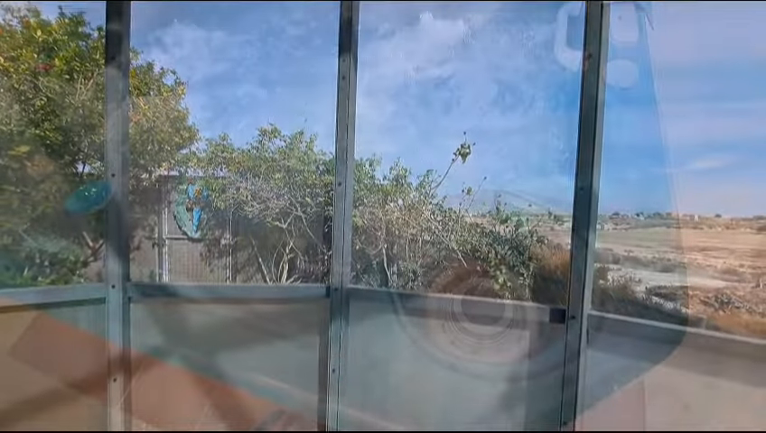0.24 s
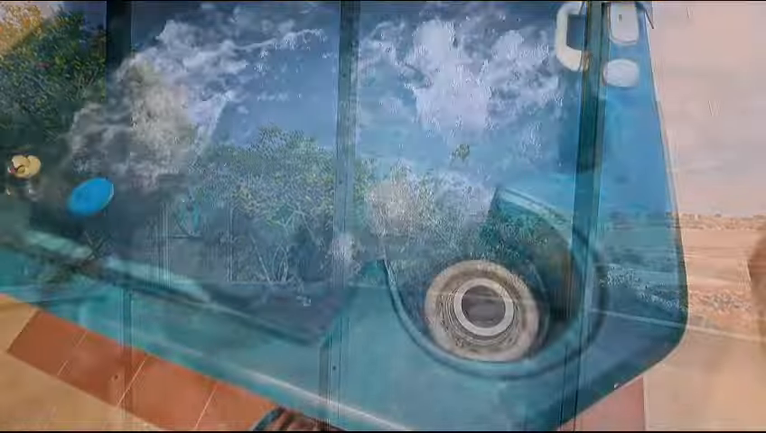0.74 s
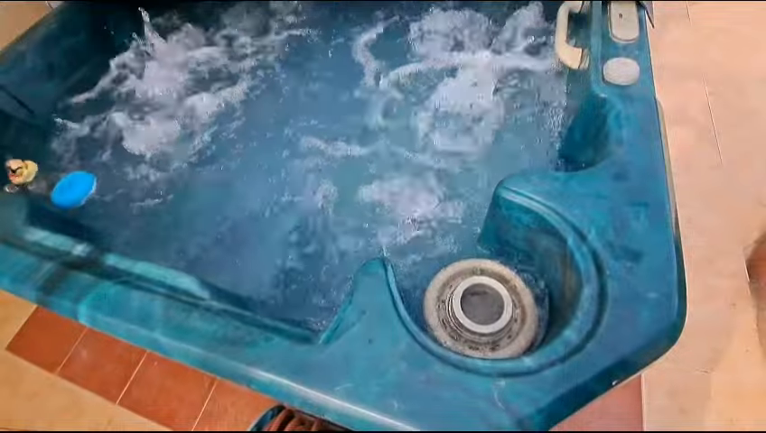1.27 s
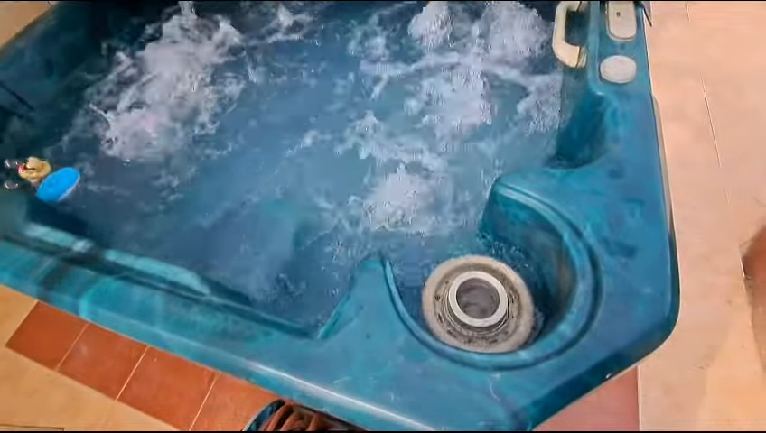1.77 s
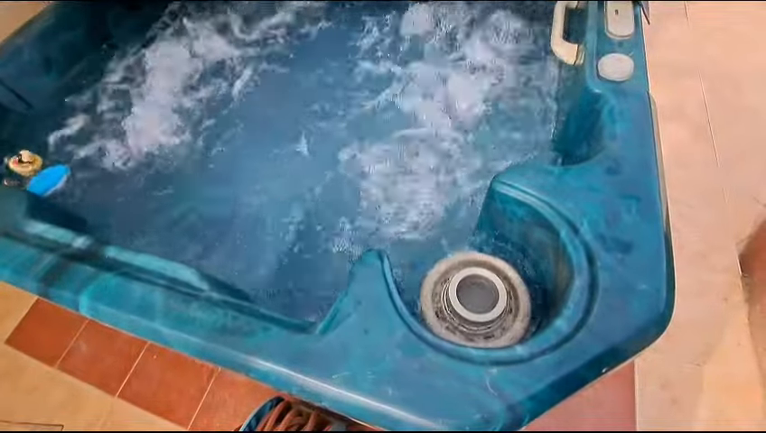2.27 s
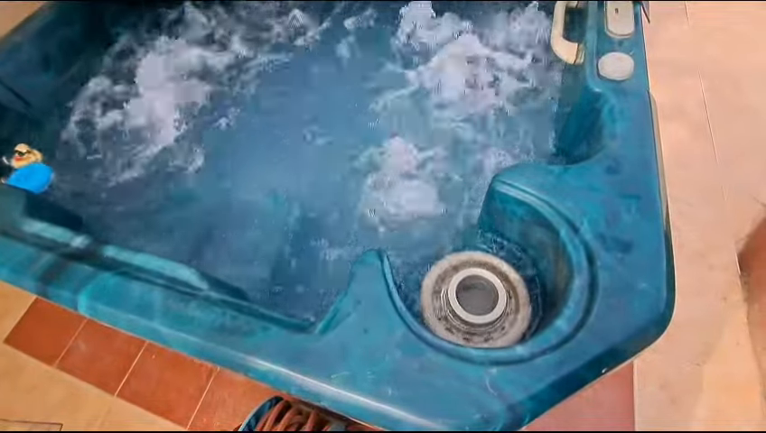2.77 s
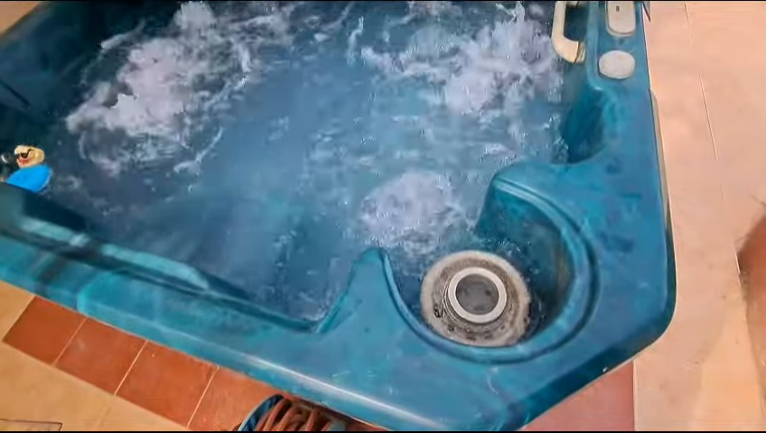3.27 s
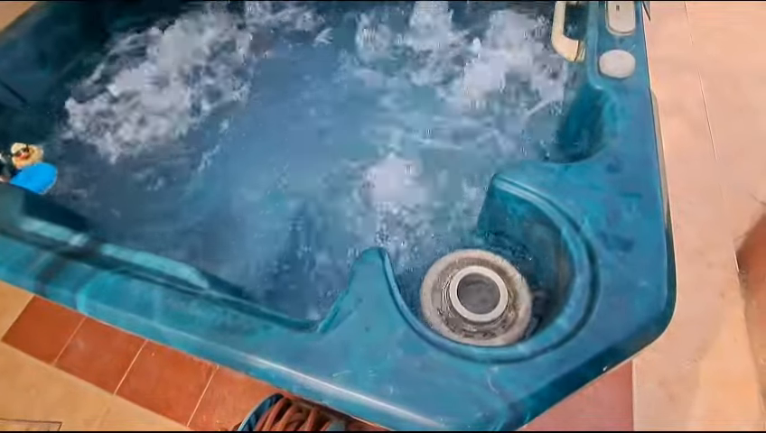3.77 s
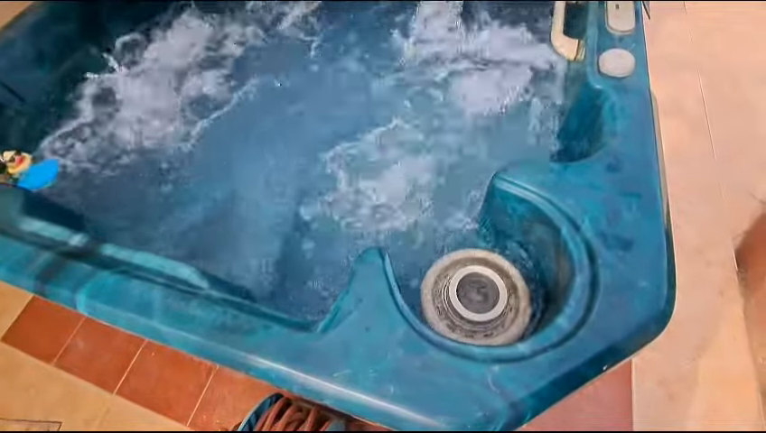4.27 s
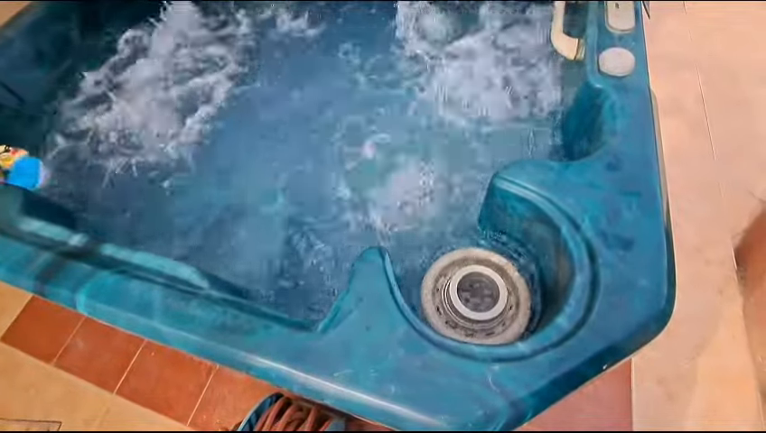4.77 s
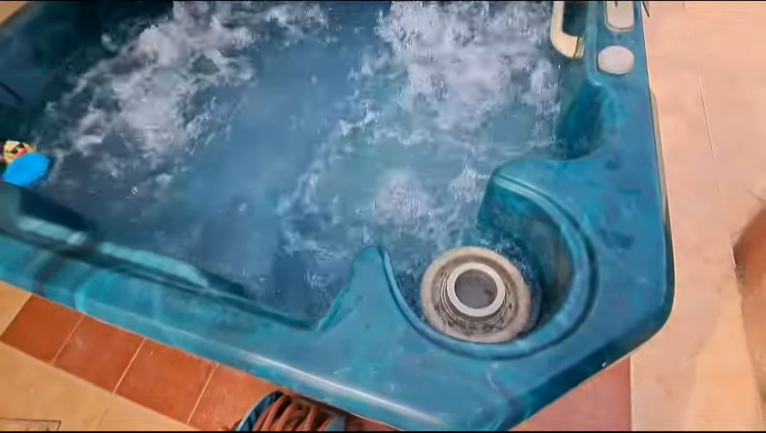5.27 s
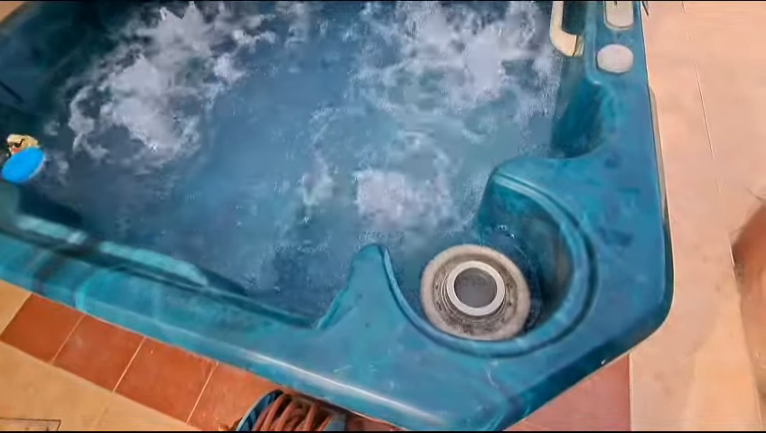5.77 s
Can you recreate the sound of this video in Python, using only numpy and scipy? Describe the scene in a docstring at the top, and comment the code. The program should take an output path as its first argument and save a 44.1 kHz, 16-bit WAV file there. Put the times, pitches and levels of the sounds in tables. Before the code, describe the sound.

After half a second of near-silent terrace air, a hot tub abruptly starts churning close by, gulping, splashing and fizzing, with wind buffeting late.

```python
"""A hot tub with its jets running, heard close on two microphone ports, after half a second of quiet terrace.
Pockets of air gulp and churn under water as swarms of ringing bubbles that climb in pitch.
The boiling surface splashes and plops, foam fizzes in fine clicks and spray ticks; glazed walls answer briefly.
The terrace behind is a fading bed of coloured noise. A light breeze lies over both places, with faint gusts
on the terrace and strong ones near the end that buffet mostly the left port as low, uneven noise."""
import sys
import numpy as np
from scipy import signal
from scipy.fft import rfft, irfft, next_fast_len
from scipy.io import wavfile
from scipy.ndimage import map_coordinates

SR = 44100
rng = np.random.default_rng(int(sys.argv[2]) if len(sys.argv) > 2 else 0)


def unload_wav(signal):
    """Save mono or channel-first audio to the path in sys.argv[1] as 16-bit WAV at rate SR, clipped to [-1, 1]."""
    wavfile.write(
        sys.argv[1],
        SR,
        np.round(np.clip(np.atleast_2d(signal).T, -1, 1) * 32767).astype(np.int16),
    )


N = 265482  # samples, about 6 s

# The biggest air pockets. Each row: time in seconds, level in dB before the run's own levels,
# pitch in Hz before the run's ratios, swell of the churning around it in dB.
GULPS = [(0.626, -11.5, 236, -0.5), (0.654, -8.5, 272, 2), (1.04, -10.5, 196, 1.5), (1.069, -9, 282, 0),
         (1.25, -8.5, 260, 4), (1.56, -12.5, 228, 3.5), (1.836, -2, 266.5, 1), (2.142, -10, 243, 0.5),
         (2.249, -12.5, 231.5, 3.5), (2.427, -9.5, 247, 2), (2.69, -13, 343, 1.5), (2.89, -14, 260, 2.5),
         (3.166, -13, 171, 1), (3.294, -11, 244, 1), (3.514, -8, 230, 2.5), (3.8, -11, 281, -5),
         (3.941, -10.5, 227, -0.5), (4.268, -5.5, 292, -4.5), (4.37, -13, 293, 0), (4.814, -13, 172, -2),
         (4.889, -10.5, 220, 2), (4.985, -12, 279, 0.5), (5.183, -13, 226, 1.5), (5.39, -16, 335, 1),
         (5.436, -7, 220, 4), (5.605, -4.5, 266, 3)]
# A pocket comes up as a rising run of three bubbles. Each row: delay in seconds,
# pitch as a ratio to the pocket's, level in dB relative to the pocket's.
GULP_RUN = [(-.014, 0.721, -12.5), (0, .9, -6.5), (.015, 1.35, -18)]
# Colour of the churning under water. Each row: frequency in Hz, relative gain in dB.
CHURN_COLOUR = [(15, -51), (25, -29), (43, -9.5), (70, -7), (140, -3), (205, -5), (269, -3.5), (305, -3),
                (446, -10.5), (491, -13.5), (729, -20.5), (924, -23.5), (1100, -23), (1430, -30),
                (2420, -120)]
# How hard the surface boils. Each row: time in seconds, splash level in dB before trim and swells.
BOIL = [(.6, -37), (1.3, -38), (1.8, -34), (2.5, -33.5), (3.0, -34), (3.7, -33), (4.2, -33.5), (5.25, -34),
        (5.55, -34.5), (6.0, -35.5)]
# Crests that break and throw spray. Each row: time in seconds, length in seconds,
# swell of the splash in dB, swell of the fizz in dB.
CRESTS = [(0.796, .2, 0.5, 2.5), (1.262, .1, 2.5, 3), (1.79, 0.18, 1.5, 4), (2.117, 0.078, 1.5, 3),
          (2.327, .1, 1.5, 2.5), (2.41, .05, 3.5, 4.5), (2.48, 0.076, 2, 7), (2.612, 0.13, 2.5, 4),
          (2.792, 0.029, 1.5, 4), (2.935, 0.085, 2, 5), (3.252, .06, 3.5, 5), (3.43, .14, 1, 1),
          (3.61, 0.036, 2.5, 4.5), (3.833, 0.14, 4.5, 5), (4.35, 0.047, 0, 4.5), (4.795, .08, 1.5, 6.5),
          (4.878, 0.097, 3, 1), (5.29, 0.17, 3.5, 4.5), (5.864, 0.032, 4, 5)]
# Colour of the splashing surface. Each row: frequency in Hz, relative gain in dB.
SPLASH_COLOUR = [(350, -7.5), (600, -1), (733, -0.5), (1020, -9), (1270, -5.5), (1670, -7.5), (2320, -8),
                 (3020, -13.5), (5520, -21.5), (7500, -26.5), (9750, -40), (16500, -120)]
# Colour of the foam. Each row: frequency in Hz, relative gain in dB.
FIZZ_COLOUR = [(2650, -0.5), (4500, 0), (5550, -3), (7960, -14.5), (12900, -2), (15200, -10), (15700, -6)]
# Bubbles bursting at the surface. Each row: start in seconds, level in dB before the mix of ring and splat,
# nominal pitch in Hz.
PLOPS = [(0.743, -18.5, 1160), (1.402, -15.5, 1144), (1.783, -19, 2300), (1.813, -14, 2300),
         (1.935, -19, 620), (2.474, -12, 766), (2.515, -14.5, 2040), (2.601, -19, 759), (2.713, -14, 578),
         (3.398, -13, 730), (3.436, -16.5, 1360), (3.55, -14, 1110), (3.732, -13.5, 2180),
         (3.862, -13.5, 636), (4.354, -14.5, 1230), (4.651, -17.5, 2030), (4.883, -10, 2310),
         (5.361, -14, 1680)]
# The nearest drops of spray. Each row: start in seconds, level in dB before colouring,
# left over right in dB before the ports' colour.
DROPS = [(1.138, -31, -6.0), (1.2175, -28, 7), (1.7434, -35, -4.5), (2.094, -28, -5), (2.109, -27, -4.0),
         (2.2717, -28, 0), (2.3, -25.5, -3), (2.492, -22.5, 1), (2.498, -23, 7), (3.0004, -30, -2),
         (3.7898, -26, 3), (4.043, -27, -6), (4.5236, -27, 6), (4.803, -26, -1), (4.8793, -27, -1),
         (4.9862, -25, 5), (5.2824, -25, -4.0), (5.3254, -27, -7.0), (5.3357, -26, -10), (5.8351, -24, -8)]
# Colour of a drop's tick. Each row: frequency in Hz, gain in dB.
TICK_COLOUR = [(800, -25), (3000, 5), (5500, 6.5), (8500, -9), (13000, -6), (16000, -10)]
# How long the glazed walls ring on. Each row: frequency in Hz, time to fall 60 dB in seconds.
WALL_DECAY = [(150, 0.069), (1500, 0.15), (12000, 0.092)]
# How alike the two sides of a wide sound are. Each row: frequency in Hz, left-right correlation (0 to 1).
LIKENESS = [(40, 0.72), (120, 0.99), (280, 0.98), (500, 0.67), (1000, 0.41), (2500, 0.076), (6000, 0.05),
            (15000, 0.038)]
# Difference in colour of the two microphone ports. Each row: frequency in Hz, left over right in dB.
PORTS = [(60, 0), (210, 0), (500, -2.3), (800, -1.5), (1200, -3.5), (2000, -8), (4200, -8.5), (6000, -6.5),
         (7800, 6.5), (9800, 11.5), (12500, -2), (15000, 0)]
# Gusts on the ports. Each row: time of the peak in seconds, length in seconds,
# level on the left port in dB before the flutter.
GUSTS = [(0.194, 0.095, -55), (0.324, 0.089, -53), (0.427, 0.045, -59), (4.63, .06, -29),
         (5.27, 0.2, -23.5), (5.44, 0.078, -19), (5.603, 0.17, -22.5), (5.723, 0.16, -17)]
# Colour of wind on a port. Each row: frequency in Hz, relative gain in dB.
BUFFET_COLOUR = [(15, -32), (40, -5), (70, -0.5), (130, -7.5), (250, -14), (500, -20), (1500, -58),
                 (5000, -100)]
# Colour of the terrace air. Each row: frequency in Hz, relative gain in dB.
TERRACE_COLOUR = [(59, -22), (100, -22), (217, -13), (304, -9), (345, -2), (524, -12), (607, -5.5),
                  (942, -14), (1730, -14.5), (1960, -19), (3530, -24), (6350, -21.5), (8170, -33),
                  (15000, -35)]

TERRACE_ENDS_S, TUB_STARTS_S, TUB_FADE_IN_S = 0.541, 0.589, 0.0027
USUAL_BOIL_DB = -34
# levels at the usual boil, before swells, and dB more for each dB of boil
CHURN_DB, CHURN_GROWS = -25, 0.69
FIZZ_DB, FIZZ_GROWS = -44, 0.91
GURGLE_S = 0.13  # width of the churning's swell around a pocket
# the opposite swing after the swell: delay, width, depth as a share of the swell
LULL_AFTER_S, LULL_S, LULL_SHARE = 0.092, 0.15, 0.29
BREEZE_DB = -69  # the light air under the gusts, on the left port before the flutter
TERRACE_DB, TERRACE_FADE_DB_PER_S = -60.5, 10.5  # level at the start, and its fall
TOP_HZ = 15900  # upper limit of the recorder


def amp(db):
    """Decibels to gain."""
    return 10 ** (np.asarray(db) / 20)


def unit(x):
    """Scale to rms 1."""
    return x / np.sqrt(np.mean(x ** 2) + 1e-20)


def along(points, hz):
    """Read (Hz, value) points on a log frequency axis."""
    f, v = np.transpose(points)
    return np.interp(np.log(hz + 1), np.log(f + 1), v)


def wobble(rate):
    """A smooth random curve, rate knots a second."""
    knots = rng.standard_normal(2000)
    return map_coordinates(knots, [np.arange(N) * rate / SR], mode="wrap")


def hump(s, length):
    """A smooth rise to 1 at s seconds and back, length seconds wide at 1/e."""
    return np.exp(-np.minimum((2 * (np.arange(N) / SR - s) / length) ** 2, 50))


def noise():
    """Two unrelated white noises."""
    return rng.standard_normal((2, N))


def filtered(x, response):
    """Multiply the spectrum of x by a response of frequency."""
    m = next_fast_len(N + SR // 4)
    return irfft(rfft(x, m) * response(np.fft.rfftfreq(m, 1 / SR)), m)[..., :N]


def spread(pair, colour):
    """Colour two unrelated signals and share them between the sides: bass alike, treble apart."""
    def response(hz):
        turn = np.arccos(np.clip(along(LIKENESS, hz), -1, 1)) / 2
        return amp(along(colour, hz)) * np.array([np.cos(turn), np.sin(turn)])

    mid, side = filtered(np.array([pair[0] + pair[1], pair[0] - pair[1]]), response)
    return unit(np.array([mid + side, mid - side]))


def bubble(age, life, rise, swell):
    """A bubble's ring, all ages in cycles: it swells, dies by 40 dB over its life and climbs in pitch."""
    envelope = (1 - np.exp(-(age / swell) ** 2)) * 100 ** (-age / life)
    return envelope * np.sin(2 * np.pi * age * (1 + rise * age / (2 * life)))


def swarm(count, low_hz, high_hz, life, rise, swell, scatter_db):
    """Two streams of bubbles of random time, size and pitch, about even in power per Hz."""
    when, pitch, size, ear, damping = rng.random((count, 5)).T
    hz = low_hz * (high_hz / low_hz) ** pitch
    # louder with pitch, so that the shorter rings of high bubbles keep the power even
    gain = hz * amp(-scatter_db * np.log(np.maximum(size, np.exp(-5))))
    lives = life * 2 ** (damping - 0.5)
    k = np.arange(min(int(life * SR / low_hz), 3000000 // count))  # the cap saves memory
    rings = gain[:, None] * bubble(hz[:, None] * k / SR, lives[:, None], rise, swell)
    # both streams lie end to end in one line; each bubble falls into one of them
    first = (when * N).astype(int) + N * (ear > 0.5)
    at = first[:, None] + k
    line = np.bincount(at.ravel(), rings.ravel(), 2 * N)[:2 * N]
    return unit(line.reshape(2, N))


def churn(level_db):
    """Air from the jets breaks into large bubbles over the rumble of the moving water."""
    large = swarm(count=1300, low_hz=111.5, high_hz=443.3, life=13.4, rise=0.25, swell=1.31, scatter_db=0.04)
    small = swarm(count=1500, low_hz=413, high_hz=1237, life=11.8, rise=0.16, swell=0.78, scatter_db=2.5)
    water = large + small + amp(14.5) * noise()
    return amp(level_db + 0.66 * wobble(22)) * spread(water, CHURN_COLOUR)


def gurgles():
    """Decibels by which the churning swings around each air pocket and then the opposite way behind it."""
    return sum(swell_db * (hump(s, GURGLE_S) - LULL_SHARE * hump(s + LULL_AFTER_S, LULL_S))
               for s, _, _, swell_db in GULPS)


def gulps():
    """Now and then a big pocket of air wells up with a hollow, rising note, alike on both sides."""
    out, t = np.zeros(N + SR), np.arange(SR // 8) / SR
    for s, db, hz, _ in GULPS:
        for delay, ratio, share_db in GULP_RUN:
            ring = bubble(ratio * hz * t, life=13.1, rise=0.48, swell=0.97)
            ring = ring / np.abs(ring).max()
            out[round((s + delay) * SR):][:len(t)] += amp(db + share_db) * ring
    return out[:N]


def crests():
    """Decibels by which breaking crests lift the splash and the fizz."""
    return sum(np.outer([splash_db, fizz_db], hump(s, length)) for s, length, splash_db, fizz_db in CRESTS)


def splash(level_db, surge):
    """The boiling surface folds over on itself: a wash full of small ringing bubbles."""
    plinks = swarm(count=3600, low_hz=748, high_hz=3046, life=21.4, rise=0.16, swell=0.17, scatter_db=2.5)
    patter = swarm(count=9000, low_hz=2994, high_hz=7070, life=27, rise=0.11, swell=0.24, scatter_db=2.5)
    water = plinks + amp(3.5) * patter + amp(12) * noise()
    swing_db = 1.44 * surge + 0.25 * wobble(25)
    return amp(level_db + 2 + swing_db) * spread(water, SPLASH_COLOUR)  # 2 dB trim


def fizz(level_db, surge):
    """Foam bursts in tiny sharp clicks over a fine hiss."""
    clicks = swarm(count=7000, low_hz=4500, high_hz=15100, life=4, rise=0.1, swell=0.093, scatter_db=3)
    foam = clicks + amp(4) * noise()
    swing_db = 0.26 * surge + 1.45 * wobble(70)
    return amp(level_db + swing_db) * spread(foam, FIZZ_COLOUR)


def plops():
    """A bubble's skin tears open: its cavity rings briefly inside a splat of water."""
    out, t = np.zeros((2, N + SR)), np.arange(SR // 16) / SR
    for s, db, hz in PLOPS:
        ring = bubble(0.985 * hz * t, life=27, rise=0.13, swell=0.79)
        band = signal.butter(2, [0.6 * hz, 1.5 * hz], "band", fs=SR, output="sos")
        splat = unit(signal.sosfilt(band, rng.standard_normal((2, len(t)))))
        splat = splat * amp(-60 * t / 0.062)  # falls 60 dB in 62 ms
        out[:, round(s * SR):][:, :len(t)] += amp(db) * (amp(-5.5) * ring + amp(-18.5) * splat)
    return out[:, :N]


def drops():
    """Spray lands on the water close by with a sharp tick: a burst of noise that falls 60 dB in 13 ms."""
    out, t = np.zeros((2, N + SR)), np.arange(SR // 50) / SR
    for s, db, pan_db in DROPS:
        tick = rng.standard_normal((2, len(t))) * amp(-60 * t / 0.013)
        pan = amp([[pan_db / 2], [-pan_db / 2]])
        out[:, round(s * SR):][:, :len(t)] += amp(db) * pan * tick
    return filtered(out[:, :N], lambda hz: amp(along(TICK_COLOUR, hz)))


def walls(x):
    """The glazed walls give a short answer, redrawn every 1/8 s as the splashes move about the tub."""
    out, step = np.zeros((2, N + SR)), SR // 8
    for start in range(0, N, step):
        # noise that dies at its own rate in each band
        hz, t, z = signal.stft(rng.standard_normal((2, SR // 6)), SR, nperseg=256)
        decay = amp(-60 * t / along(WALL_DECAY, hz)[:, None])
        tail = signal.istft(z * decay, SR, nperseg=256)[1]
        tail = tail / np.linalg.norm(tail[0])
        echo = signal.fftconvolve(x[:, start:start + step], tail, axes=1)
        out[:, start:start + echo.shape[1]] += echo
    return out[:, :N]


def tub():
    """Churn, splash and fizz follow the boil; surges of the surface drive splash and fizz together."""
    boil_s, boil_levels = np.transpose(BOIL)
    boil_db = np.interp(np.arange(N) / SR, boil_s, boil_levels)
    extra_db, surge = boil_db - USUAL_BOIL_DB, wobble(30)
    crest_splash_db, crest_fizz_db = crests()
    fizz_db = FIZZ_DB + FIZZ_GROWS * extra_db + crest_fizz_db
    churn_db = CHURN_DB + CHURN_GROWS * extra_db + gurgles()
    surface = splash(boil_db + crest_splash_db, surge) + fizz(fizz_db, surge) + plops() + drops()
    water = churn(churn_db) + gulps() + surface + amp(-10.5) * walls(surface)
    # each microphone port has its own colour
    halves = np.array([[0.5], [-0.5]])
    return filtered(water, lambda hz: amp(halves * along(PORTS, hz)))


def wind():
    """A light breeze and its gusts send eddies thumping on the ports, the right one 14 dB softer."""
    strength = amp(BREEZE_DB) + sum(amp(db) * hump(s, length) for s, length, db in GUSTS)
    eddies = unit(filtered(noise(), lambda hz: amp(along(BUFFET_COLOUR, hz))))
    flutter = amp(1.5 * wobble(39))
    return strength * flutter * eddies * amp([[0], [-14]])


def terrace():
    """The quiet air of the terrace: coloured noise that fades steadily."""
    fade_db = TERRACE_FADE_DB_PER_S * np.arange(N) / SR
    return amp(TERRACE_DB - fade_db) * spread(noise(), TERRACE_COLOUR)


def scene():
    """First the still terrace, a moment of silence, then the tub; the breeze touches both."""
    t, breeze = np.arange(N) / SR, wind()
    on_terrace = t < TERRACE_ENDS_S
    at_tub = np.clip((t - TUB_STARTS_S) / TUB_FADE_IN_S, 0, 1)
    return (terrace() + breeze) * on_terrace + (tub() + breeze) * at_tub


def record(dry):
    """The recorder keeps nothing above its band limit, reached over a 100 Hz slope."""
    return filtered(dry, lambda hz: np.clip((TOP_HZ - hz) / 100, 0, 1))


dry = scene()
out = record(dry)
unload_wav(out)
```